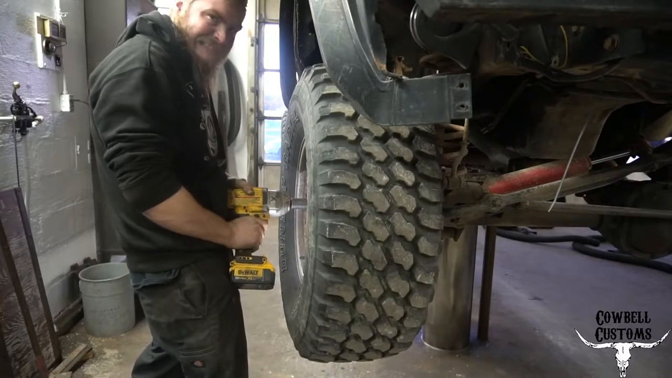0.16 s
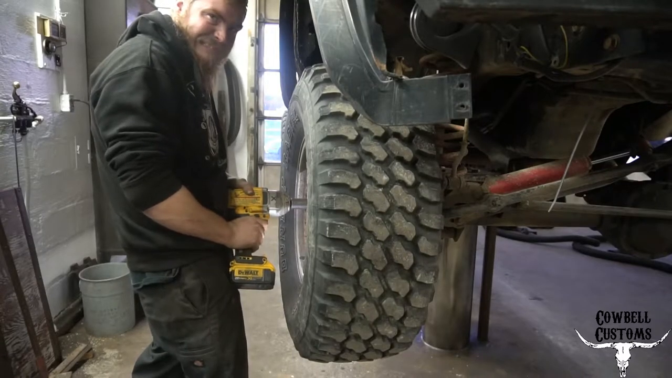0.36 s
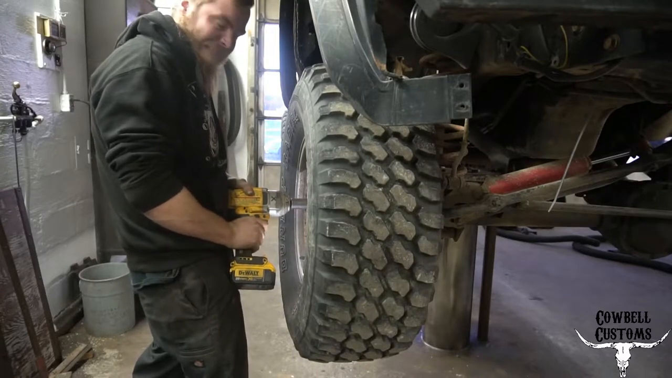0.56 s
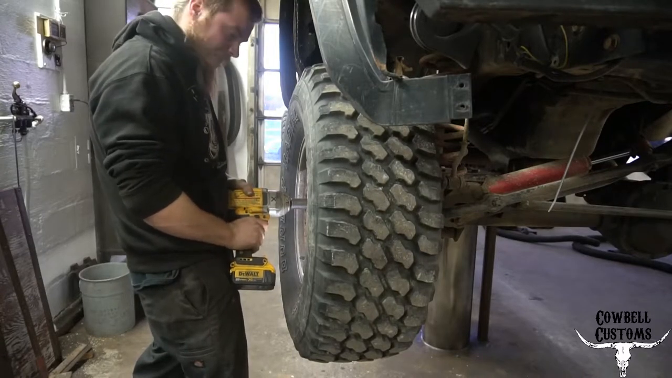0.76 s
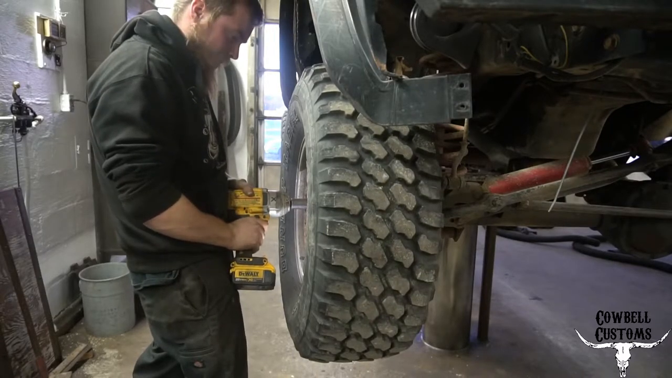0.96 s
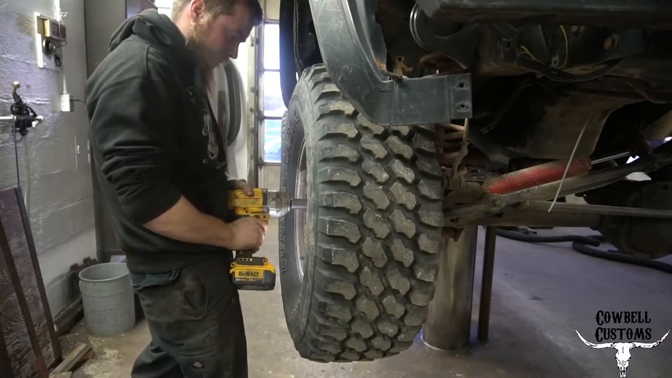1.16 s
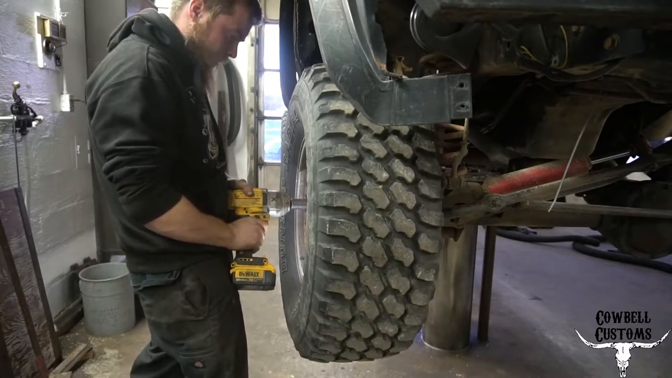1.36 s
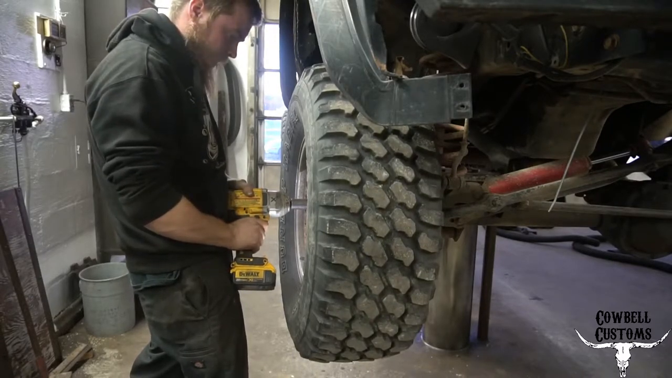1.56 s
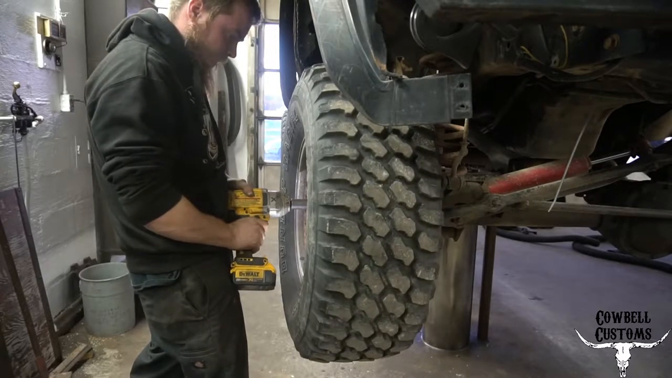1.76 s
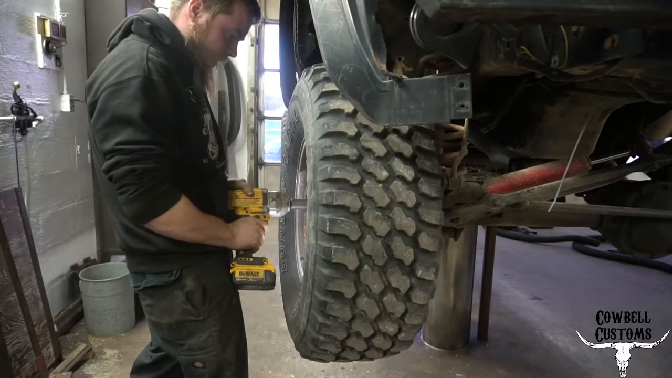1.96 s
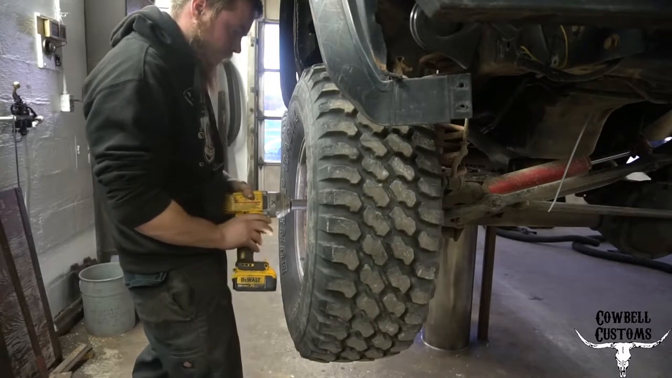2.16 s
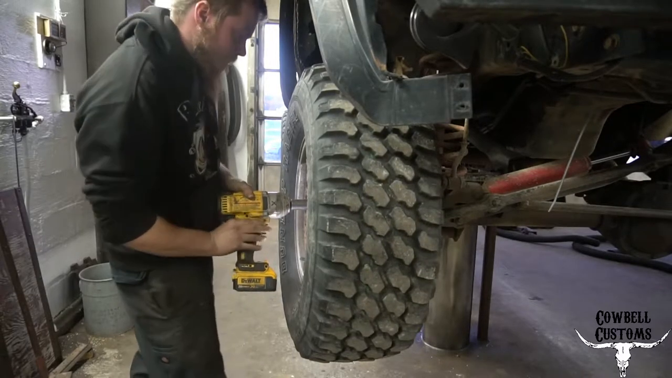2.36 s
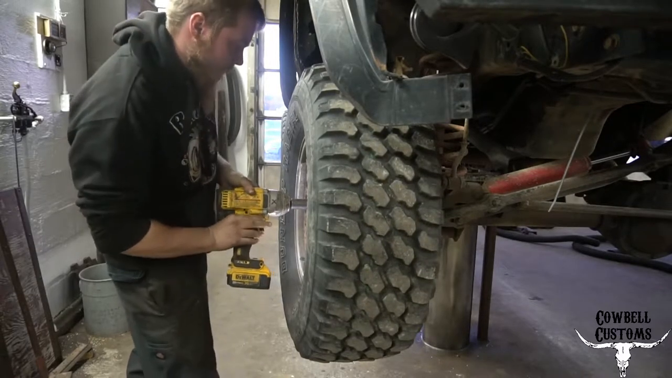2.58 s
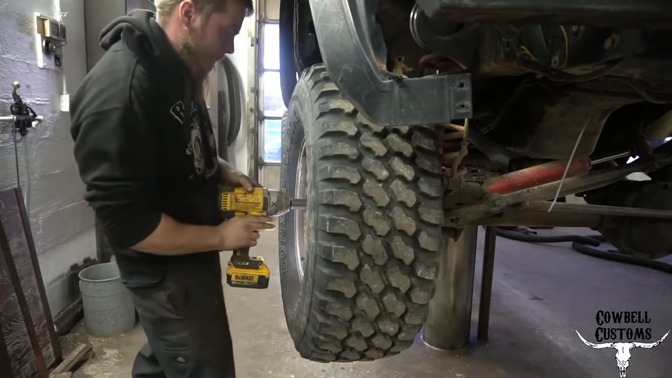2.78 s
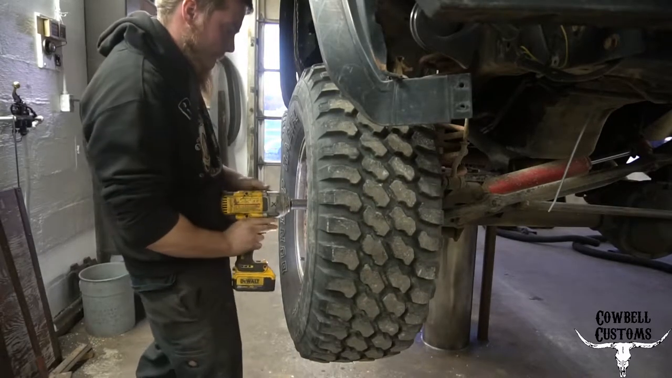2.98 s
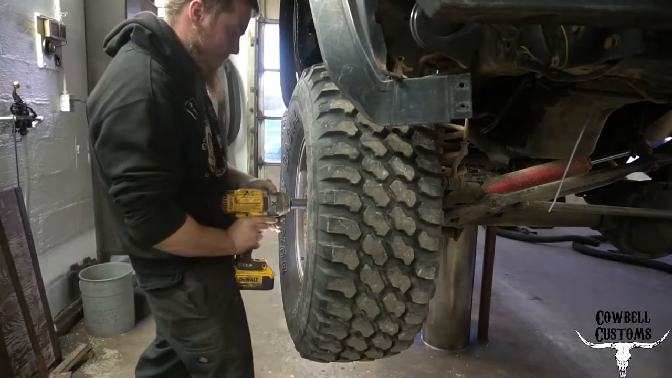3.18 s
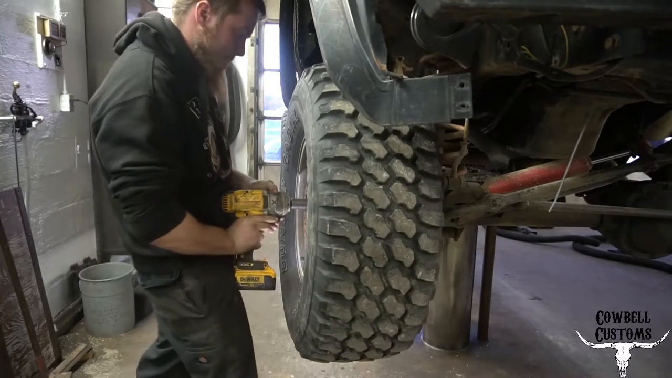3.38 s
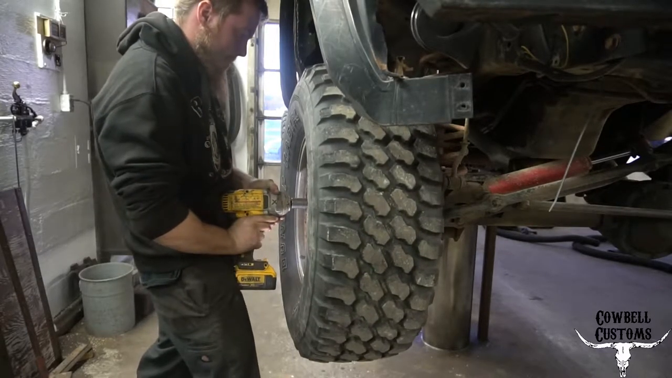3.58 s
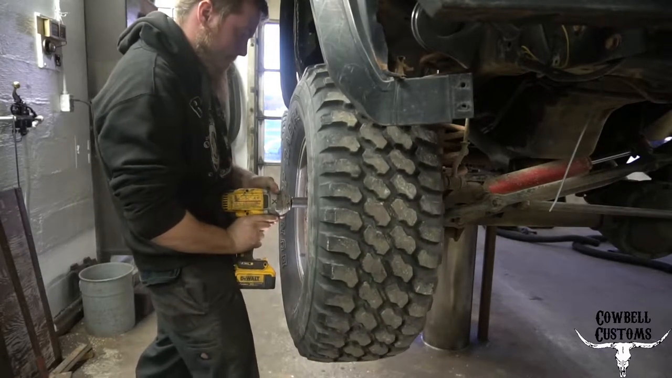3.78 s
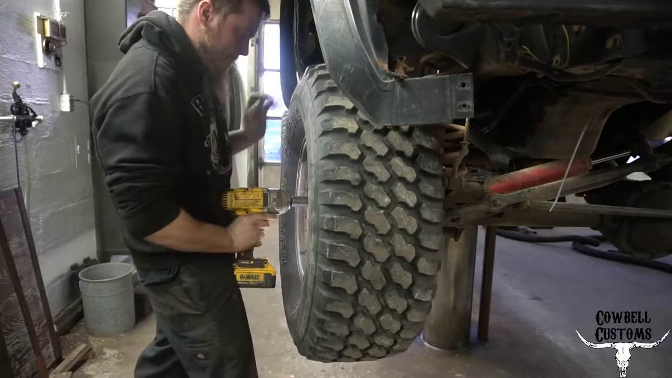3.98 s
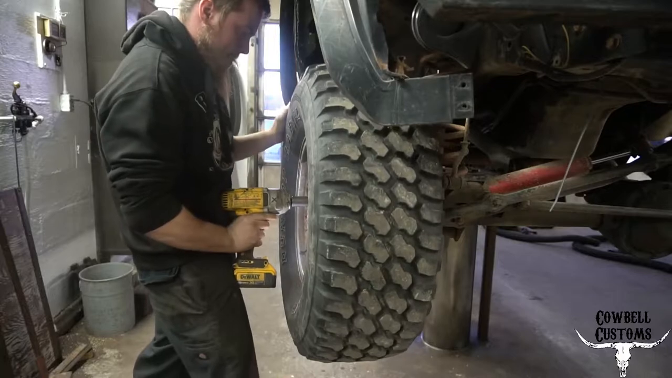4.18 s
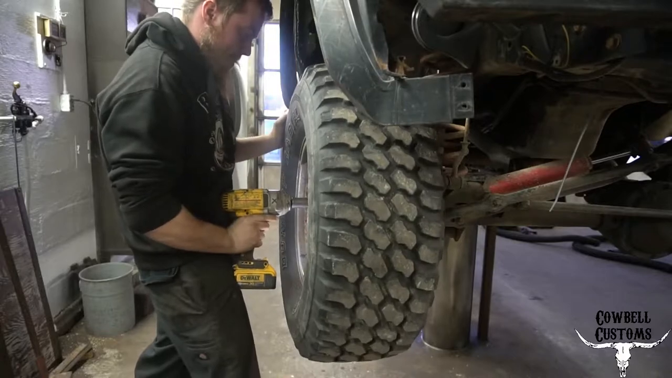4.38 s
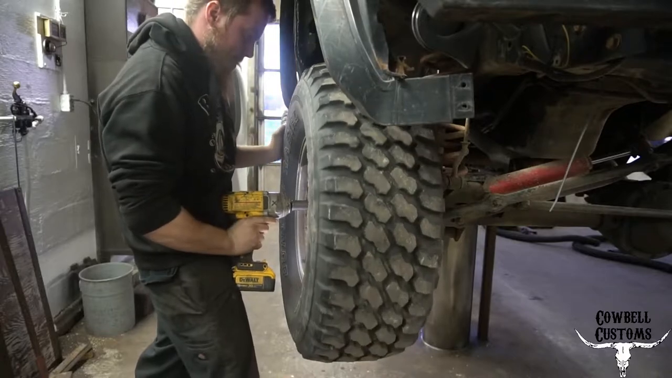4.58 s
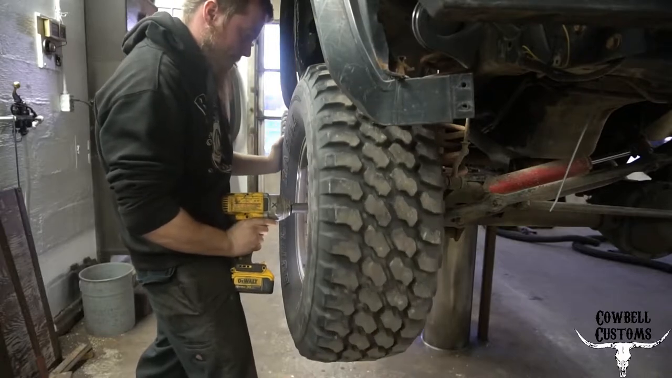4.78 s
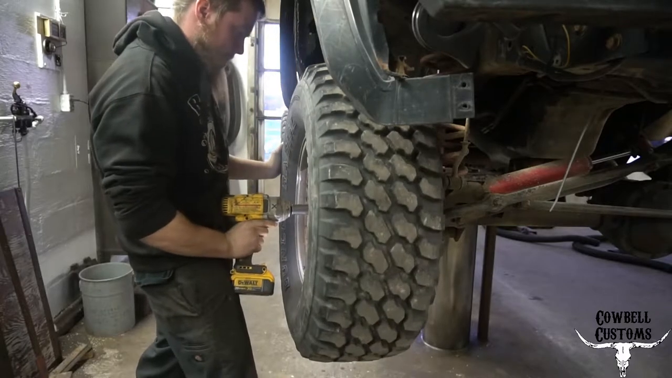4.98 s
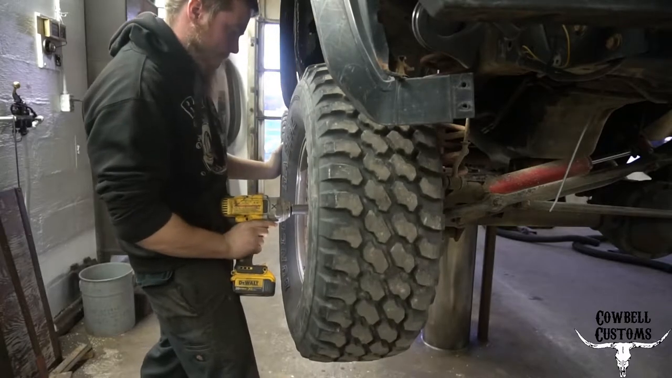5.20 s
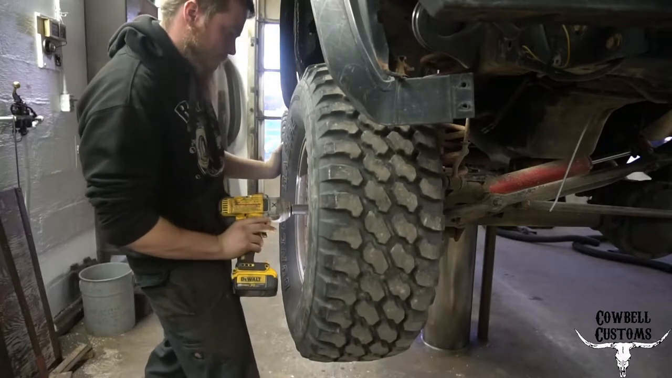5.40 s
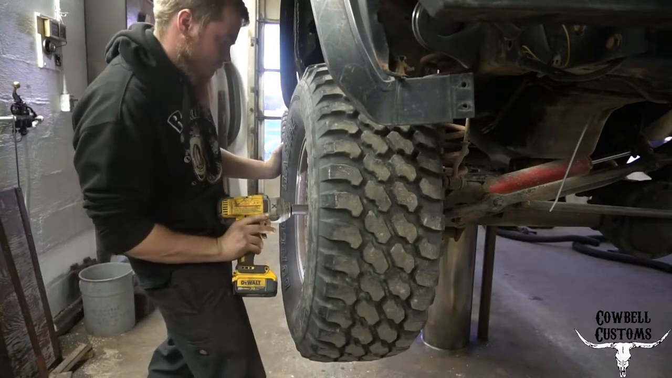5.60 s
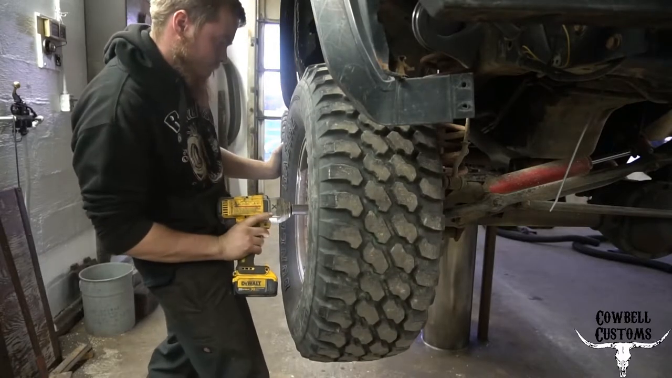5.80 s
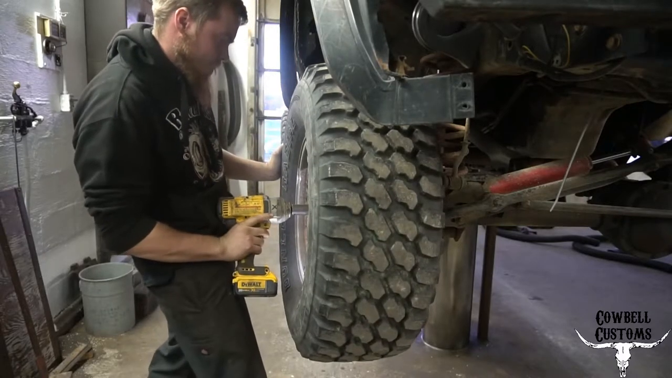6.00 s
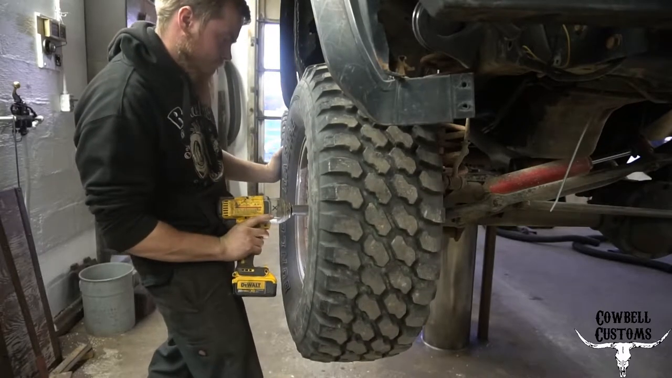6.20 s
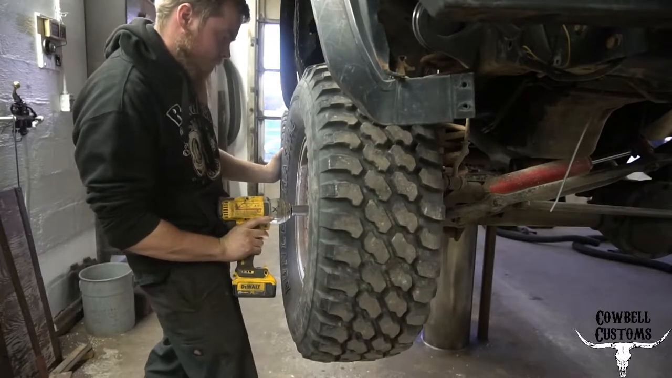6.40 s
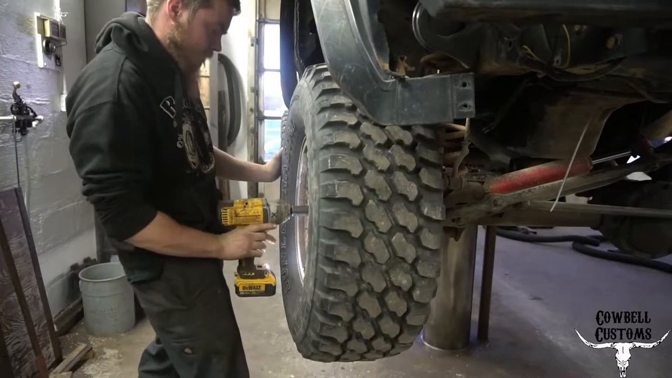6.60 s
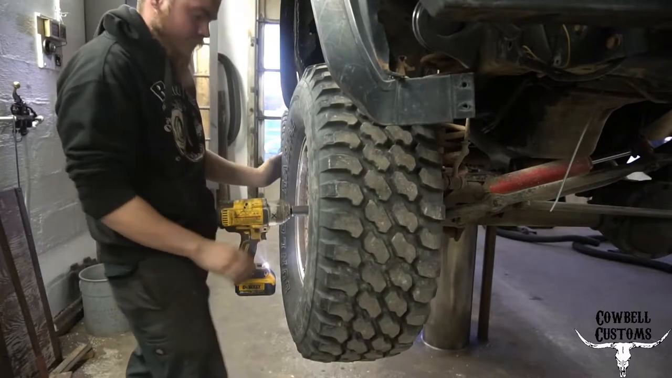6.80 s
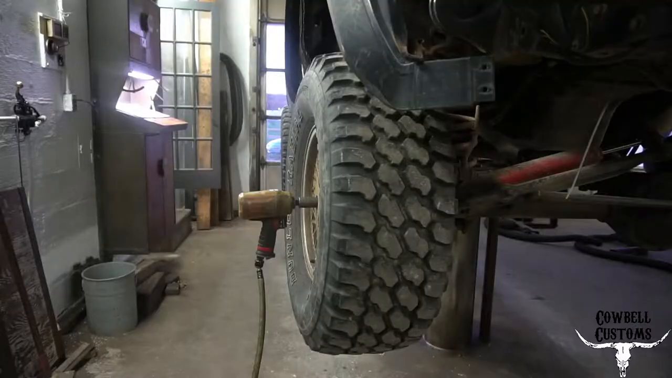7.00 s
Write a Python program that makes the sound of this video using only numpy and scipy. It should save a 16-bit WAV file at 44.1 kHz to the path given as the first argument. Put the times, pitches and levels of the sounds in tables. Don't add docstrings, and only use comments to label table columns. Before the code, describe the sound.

A cordless impact wrench hammers loudly on wheel nuts in three bursts inside a hard-walled workshop, then an abrupt cut to a chugging air compressor.

```python
import sys
import numpy as np
from scipy import signal
from scipy.fft import rfft, irfft
from scipy.io import wavfile
from scipy.ndimage import uniform_filter1d

SR = 44100
rng = np.random.default_rng(int(sys.argv[2]) if len(sys.argv) > 2 else 0)


def undo_db(level):
    steps = np.asarray(level, float) / 20
    return 10 ** steps


def generate_wav(signal):
    frames = np.transpose(np.atleast_2d(signal))
    scaled = np.clip(frames, -1, 1) * 32767
    pcm = np.round(scaled).astype(np.int16)
    wavfile.write(sys.argv[1], SR, pcm)


N = 310905

# time in seconds, blows struck so far.
BURST_PACE = [
    [(.0096, 0), (.2158, 6), (.2824, 8), (1.0037, 29), (1.4827, 43), (1.686, 49), (2.0979, 61)],
    [(3.3128, 0), (4.0286, 21), (4.3326, 30), (5.0122, 50), (5.2861, 58)],
    [(5.9319, 0), (6.2721, 10), (6.5121, 17)],
]
# strong blow in dB, weak lug in dB below, first blow weak (0/1).
ANVIL_LUGS = [
    (.2, 1.3, 0),
    (-.6, 2.2, 1),
    (-.3, .7, 1),
]
# start in seconds, level in dB, socket ring in Hz,
# share of ring (0-1), smear in ms.
LONE_KNOCKS = [(2.139, -6, 3000, .3, 2.5), (2.160, -4, 2500, .3, 1.5), (2.177, -9, 3000, .2, 2.),
               (3.2505, -1, 4300, .5, 2.), (3.273, -1, 2800, .7, .5), (3.282, -1, 3300, .5, .7),
               (3.293, 1, 2700, .5, 1.), (3.299, -5, 4500, .3, 1.5), (5.327, -2, 2700, .5, 1.2),
               (5.3475, -4, 2700, .4, 1.5), (5.365, -8, 3000, .1, 1.2), (5.380, -10, 3000, .2, 1.2),
               (5.867, -12, 2400, .1, 4.), (5.8925, -3, 2700, .97, .5), (5.901, -5, 2500, .3, 1.5),
               (5.912, 0, 2800, .5, .7), (6.5477, -5, 2700, .3, 3.), (6.563, -2, 2600, .3, .5),
               (6.574, 4, 2800, .8, 1.2), (6.598, -9, 2700, .3, .8)]
# delay in ms, spread in ms, level in dB, smear in ms.
LOOSE_PARTS = [(10.6, .45, -10, 1.3), (26.8, .5, -19, .25)]
# frequency in Hz, level in dB, t60 in seconds.
SOCKET_MODES = [(1962, -11.5, 0.017), (2393, -9.5, 0.012), (2752, -5, 0.017), (3090, -9.5, 0.012),
                (3927, -10.5, 0.022), (4520, -11, 0.0081), (5450, -12.5, 0.01), (6080, -12.5, 0.008),
                (7335, -16, .011), (9510, -13.5, 0.01)]
# frequency in Hz, level in dB.
CRACK_SPECTRUM = [(200, -59), (500, -25.5), (900, -16), (1500, -12), (2700, -6), (4500, -9.5), (7000, -12),
                  (8300, -14.5), (9800, -13.5), (12500, -16), (14000, -37), (16000, -39)]
# time in seconds, side modes in dB, main ring in Hz.
SOCKET_FIT = [(0, 1, 2740), (2.2, 1, 2740), (3.2, 5, 3350), (4.6, 4, 3350), (4.9, 5.5, 2800),
              (5.4, 5, 2650), (5.9, 1, 2640), (6.6, 1, 2700)]
# frequency in Hz, level in dB, t60 in seconds.
TYRE_MODES = [(140, -11, .2), (205.5, -11.5, 0.33), (294.2, 5.5, 0.19)]
HUB_MODES = [(233, 3.5, 0.55), (322, 5, 0.33), (365, -24, 0.088)]
RIM_MODES = [(535.2, -11, 0.23), (706, -18, 0.047), (828.6, 2.5, 0.068), (973, 5, 0.047), (1180, -1, 0.084),
             (850, 10, 0.006)]
# start in seconds, tyre in dB, hub in dB, rim in dB.
WHEEL_LEVELS = [
    (0, -44, -37, -25.5),
    (2.8, -45, -53, -23),
    (5.7, -48.5, -41, -22.5),
]
# middle in seconds, half length in seconds, rise in dB.
TYRE_SWELLS = [
    (3.525, 0.31, 16.5),
    (4.47, .4, 15),
    (6.3, .3, 5.5),
]
# middle in seconds, half length in seconds, change in dB.
HAND_PRESSES = [
    (.17, 0.33, -2.5),
    (2.198, 0.12, 9.5),
    (5.014, .32, -13),
    (5.37, .06, 5),
    (6.3, 0.37, -10.5),
]
# start in seconds, level in dB, frequency in Hz.
LOW_THUMPS = [(2.105, -12.5, 90), (5.088, -20, 70), (6.039, -21.5, 60), (6.27, -22, 60)]
# squeeze in seconds, full power in seconds, let go in seconds, unloaded flare in dB,
# brake in dB per second.
TRIGGER_PULLS = [
    (-.3, -.2, 2.219, 4.5, 170),
    (3.193, 3.259, 5.372, 0.3, 749),
    (5.827, 5.898, 6.572, 0.7, 260),
]
# frequency in Hz, density in dB per Hz.
WHIR_SPECTRUM = [(240, -22), (400, -8), (880, -1), (1500, -6), (2100, -3), (3000, 0), (4400, -5),
                 (6000, -7), (10000, -15), (15600, -40)]
# start in seconds, end in seconds, frequency in Hz, level in dB.
STALL_SONG = (5.834, 5.868, 1391, -33.5)
# start in seconds, level in dB, share of treble (0-1), smear in ms.
GRIP_TICKS = [(2.401, -29, 0.6, 5.8), (2.715, -53, 0, 3.), (2.822, -47.5, 0.5, 4.), (2.885, -50, 0, 6.),
              (3.041, -56, .3, 3.), (3.1945, -31.5, 0, 1.7), (5.535, -38, 1, 6.), (5.824, -34.5, 0, 3.)]
# frequency in Hz, t60 in seconds.
SHOP_DECAY = [(120, 4.5), (330, 0.76), (870, 1.105), (2300, 1.105), (6060, 0.51), (12000, 0.27)]
# frequency in Hz, level in dB.
WALL_COLOUR = [(100, -15.5), (400, 8), (900, 3), (1500, -1.5), (2900, -7), (5000, 4), (9000, -0.5),
               (15000, 3.5)]
# frequency in Hz, density in dB per Hz.
HUSH_SPECTRUM = [(18, -51), (35, -19), (90, -23), (140, -5.5), (231, -23), (284, -9), (324, -14.5),
                 (547, -14.5), (2770, -27), (5600, -35), (7200, -47), (15600, -66)]
# frequency in Hz, density in dB per Hz.
PUMP_SPECTRUM = [(18, -48), (30, -19), (85, -10), (130, -8.5), (243, -2.5), (277, -3.5), (493, -9),
                 (749, -7), (2920, -22.5), (5190, -24), (15600, -66.5)]
# frequency in Hz, width in Hz, level in dB.
INTAKE_PIPE = [(145, 9.7, 17.5), (293, 31, -9.5), (449, 36, 3), (536, 34, 4.5), (760, 60, -14)]

JITTER_MS, MISS_DB = .2, .8
REBOUND_MS, REBOUND_DB, REBOUND_SPREAD_DB = 6.05, 0.4, 0.5
BOUNCE_MS, BOUNCE_DB, BOUNCE_SPREAD_DB = 13.7, -8.2, 1.7
WEAK_BOUNCE = 1.4
LUG_PITCH, LUG_DULL = .05, 2.2
HUB_FOLLOWS = .25
RUN_DB, SURGE_DB, CREEP_DB, CREEP_SAG_DB = -21.5, 3, -36, -9
SPIN_UP_S, SETTLE_S, FLARE_S = 0.021, .1, 0.096
HUSH_DB, PUMP_DB, STROKE_HZ, CHANGE_S = -44, -19, 29.4, 6.821


def evened(x):
    return x / np.sqrt(np.mean(x ** 2) + 1e-20)


def read(points, hz):
    f, value = np.transpose(points)
    return np.interp(np.log(hz + 1), np.log(f + 1), value)


def coloured(points, size):
    hz = np.fft.rfftfreq(size, 1 / SR)
    spectrum = rfft(rng.standard_normal(size)) * undo_db(read(points, hz))
    return evened(irfft(spectrum, size))


def add(mix, start_s, sound):
    part = mix[round(start_s * SR):][:len(sound)]
    part += np.asarray(sound)[:len(part)]


def ring(hz, t60_s, t, turn=0.):
    return undo_db(-60 * t / t60_s) * np.sin(2 * np.pi * (hz * t + turn))


def hump(t, rows):
    return sum(db * np.clip(2 * (1 - abs(t - mid_s) / half_s), 0, 1) for mid_s, half_s, db in rows)


def blows():
    rows = []
    for pace, (strong_db, weak_db, first) in zip(BURST_PACE, ANVIL_LUGS):
        s, struck = np.transpose(pace)
        k = np.arange(struck[-1] + 1)
        timing, miss, dead, loose = rng.standard_normal((len(k), 4)).T
        weak = weak_db * ((k + first) % 2)
        start_s = np.interp(k, struck, s) + JITTER_MS * timing / 1000
        blow_db = strong_db - weak - MISS_DB * (miss ** 2 - 1)
        rebound_db = REBOUND_DB - REBOUND_SPREAD_DB * dead ** 2
        bounce_db = BOUNCE_DB + WEAK_BOUNCE * weak + BOUNCE_SPREAD_DB * loose
        pitch = 1 + LUG_PITCH * (1 - 2 * weak / weak_db)
        rows += zip(start_s, blow_db, rebound_db, bounce_db, pitch)
    return rows


def knock(db, hz, share, smear_ms, side_db, crack, dice):
    t = np.arange(len(crack)) / SR
    modes = ring(hz * (1 + .05 * dice[0]), .0085, t)
    level_dice, pitch_dice = dice[1:], dice[1 + len(SOCKET_MODES):]
    for (mode_hz, mode_db, t60_s), a, b in zip(SOCKET_MODES, level_dice, pitch_dice):
        gain = undo_db(mode_db + side_db + 1.2 * a)
        modes = modes + gain * ring(mode_hz * (1 + 0.055 * b), min(t60_s, .011), t, 0.33 * a)
    swell = 1 - np.exp(-t / 0.00029)
    burst = (1 - np.exp(-t / .0001)) * np.exp(-t / (smear_ms * .0015))
    sound = share * 1.33 * swell * modes + (1 - share) * burst * crack
    peak = np.sqrt(2 * uniform_filter1d(sound ** 2, size=30).max())
    return undo_db(db) * sound / peak


def hammer():
    hits = list(LONE_KNOCKS)
    sound, push, drop = np.zeros(N), np.zeros(N), np.zeros(N)
    steady = blows()
    luck = rng.standard_normal((len(steady), len(LOOSE_PARTS) + 1, 2))
    when_s, side_db, ring_hz = np.transpose(SOCKET_FIT)
    for (s, db, rebound_db, bounce_db, pitch), (slack, *chances) in zip(steady, luck):
        hz = np.interp(s, when_s, ring_hz)
        rebound_s = s + REBOUND_MS / 1000 - .0003
        bounce_s = s + (BOUNCE_MS + .3 * slack[0]) / 1000
        hits.append((s - .0003, db + .5, hz * pitch, .75 - LUG_DULL * (pitch - 1), .55))
        hits.append((rebound_s, rebound_db + .5, hz * 1.03, .52, .65))
        hits.append((bounce_s, bounce_db - .5, hz * .96, .72, .7))
        for (delay_ms, spread_ms, late_db, smear_ms), (a, b) in zip(LOOSE_PARTS, chances):
            hits.append((s + (delay_ms + spread_ms * a) / 1000, late_db + 2 * b, hz, 0, smear_ms))
        add(push, s, [1.])
        add(drop, s + .0106, [1.8])
    for s, db, *_ in LONE_KNOCKS:
        add(push, s, undo_db([db + 3.5]))
    dice = rng.standard_normal((len(hits), 1 + 2 * len(SOCKET_MODES)))
    noise = coloured(CRACK_SPECTRUM, N)
    for (s, db, hz, share, smear_ms), die in zip(hits, dice):
        at = min(round(s * SR), N - 1000)
        fit_db = np.interp(s, when_s, side_db)
        add(sound, s, knock(db, hz, share, smear_ms, fit_db, noise[at:at + 1000], die))
    return sound, push, drop


def wheel_part(drive, modes, level_db):
    t = np.arange(12000) / SR
    response = sum(undo_db(db) * ring(hz, t60_s, t) for hz, db, t60_s in modes)
    return evened(signal.oaconvolve(drive, response)[:N]) * undo_db(level_db - 6.5)


def wheel(push, drop):
    start_s, tyre_db, hub_db, rim_db = np.transpose(WHEEL_LEVELS)
    t = np.arange(N) / SR
    burst = np.searchsorted(start_s, t, "right") - 1
    swell_db = hump(t, TYRE_SWELLS)
    tyre = wheel_part(push, TYRE_MODES, tyre_db[burst] + swell_db)
    hub = wheel_part(push, HUB_MODES, hub_db[burst] + HUB_FOLLOWS * swell_db)
    rim = wheel_part(push + drop, RIM_MODES, rim_db[burst] + hump(t, HAND_PRESSES))
    return tyre + hub, rim


def thumps():
    out, t = np.zeros(N), np.arange(2000) / SR
    for s, db, hz in LOW_THUMPS:
        add(out, s, undo_db(db) * ring(hz, .025, t))
    return out


def trigger(t):
    gain = np.zeros(N)
    for squeeze_s, full_s, off_s, flare_db, brake in TRIGGER_PULLS:
        s = [squeeze_s, full_s - SPIN_UP_S, full_s, full_s + SETTLE_S,
             off_s - FLARE_S - .04, off_s - FLARE_S / 2, off_s]
        db = [CREEP_DB, CREEP_DB + CREEP_SAG_DB, RUN_DB + SURGE_DB, RUN_DB,
              RUN_DB, RUN_DB + flare_db, RUN_DB + flare_db]
        late_s = np.maximum(t - off_s, 0)
        brake_db = brake * late_s * (1 + late_s / 0.11)
        gain += undo_db(np.interp(t, s, db) - brake_db) * np.clip(1 + (t - squeeze_s) / .003, 0, 1)
    return gain


def motor():
    t = np.arange(N) / SR
    grit = undo_db(3. * evened(uniform_filter1d(rng.standard_normal(N), 60)))
    start_s, end_s, hz, db = STALL_SONG
    gate = np.clip(np.minimum(t - start_s, end_s - t) / .002, 0, 1)
    song = undo_db(db) * gate * (np.sin(2 * np.pi * hz * t) + .15 * np.sin(4 * np.pi * hz * t))
    return trigger(t) * evened(grit * coloured(WHIR_SPECTRUM, N)) + song


def ticks():
    out, t = np.zeros(N), np.arange(1500) / SR
    puffs = coloured(CRACK_SPECTRUM, 1500 * len(GRIP_TICKS)).reshape(-1, 1500)
    for (s, db, treble, smear_ms), puff in zip(GRIP_TICKS, puffs):
        bright = evened(np.diff(puff, 2, prepend=[0, 0]))
        click = (1 - treble) * puff + treble * bright
        add(out, s, undo_db(db) * np.exp(-t / (smear_ms / 1000)) * click)
    return out


def shop(x):
    out = np.zeros(N)
    turn = np.arange(N) / SR * 2 * np.pi * 2.3
    for k in range(3):
        hz, t, z = signal.stft(rng.standard_normal(2 * SR), SR, nperseg=256)
        decay_db = read(WALL_COLOUR, hz)[:, None] - 60 * t / np.abs(read(SHOP_DECAY, hz))[:, None]
        tail = signal.istft(z * undo_db(decay_db), SR, nperseg=256)[1]
        tail *= np.clip((np.arange(len(tail)) / SR - .004) / 0.025, 0, 1)
        window = np.sqrt(2 / 3) * np.cos(turn + k * np.pi / 3)
        out += signal.fftconvolve(x * window, tail / np.linalg.norm(tail))[:N]
    return out


def resonate(x, hz, width_hz):
    r = np.exp(-np.pi * width_hz / SR)
    return 2 * signal.lfilter([1 - r], [1, -r * np.exp(2j * np.pi * hz / SR)], x).real


def compressor():
    strokes = np.arange(N) / SR * STROKE_HZ + 0.44
    gulp = .5 + np.exp(-(strokes % 1) / 1.7)
    roar = evened(gulp * coloured(PUMP_SPECTRUM, N))
    drive = gulp * rng.standard_normal(N)
    pipe = evened(sum(undo_db(db) * evened(resonate(drive, hz, width_hz)) for hz, width_hz, db in INTAKE_PIPE))
    return undo_db(PUMP_DB) * evened(roar + .6 * pipe)


def hush():
    return undo_db(HUSH_DB) * coloured(HUSH_SPECTRUM, N)


def scene():
    knocks, push, drop = hammer()
    boom, clang = wheel(push, drop)
    near = knocks + clang + motor() + ticks()
    wrench = near + boom + undo_db(-7.0) * shop(near + 0.49 * boom)
    wrench = signal.lfilter(*signal.butter(3, 120., "high", fs=SR), wrench)
    before = wrench + thumps() + hush()
    after = np.clip((np.arange(N) / SR - CHANGE_S) / 0.0043, 0, 1)
    return ((1 - after) * before + after * compressor())[None]


def low_pass(x):
    return signal.sosfilt(signal.butter(12, 15710, fs=SR, output="sos"), x)


def record(dry):
    clipped = np.clip(dry, -1, 1)
    mix = signal.lfilter(*signal.butter(1, 22., "high", fs=SR), clipped)
    return low_pass(mix)


dry = scene()
out = record(dry)
generate_wav(out)
```